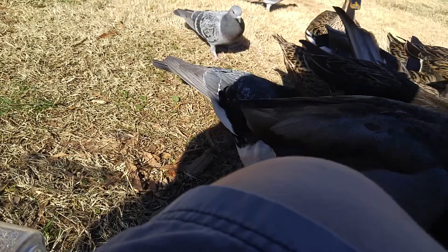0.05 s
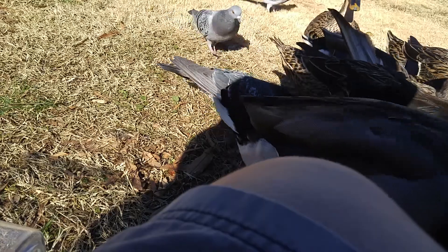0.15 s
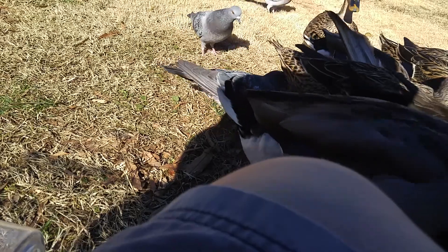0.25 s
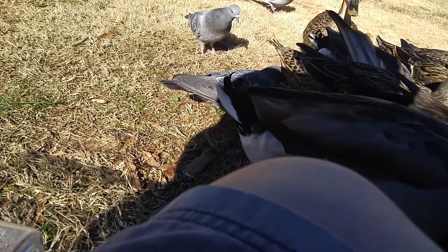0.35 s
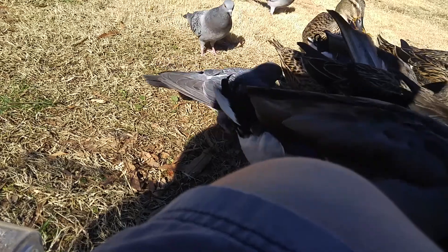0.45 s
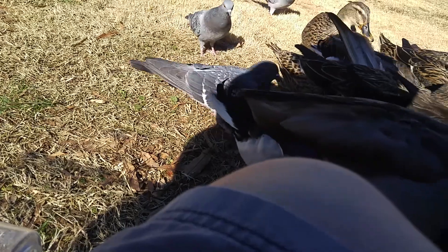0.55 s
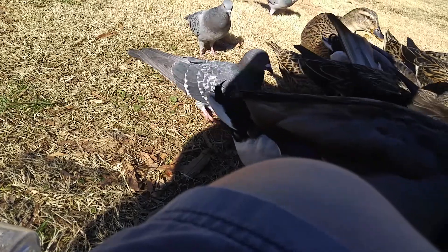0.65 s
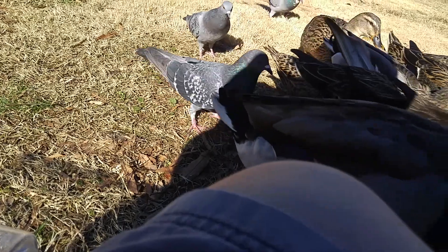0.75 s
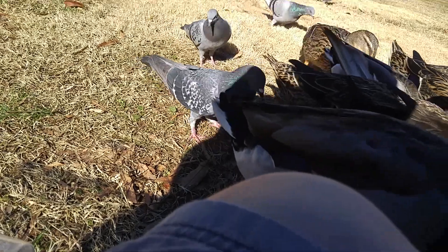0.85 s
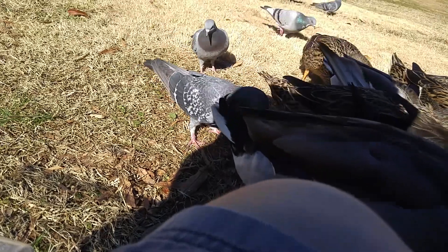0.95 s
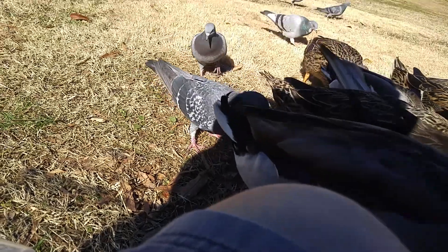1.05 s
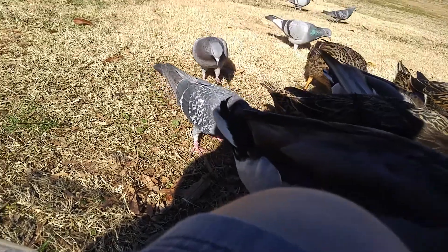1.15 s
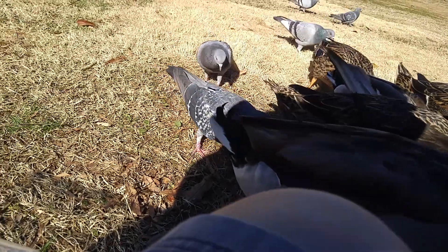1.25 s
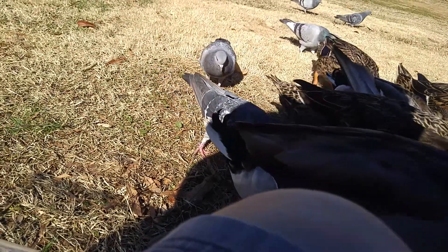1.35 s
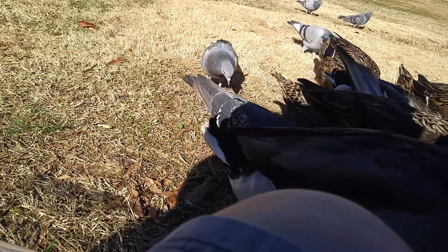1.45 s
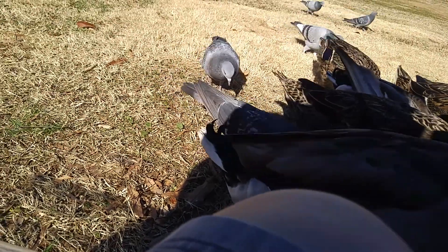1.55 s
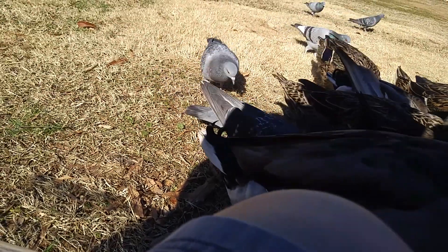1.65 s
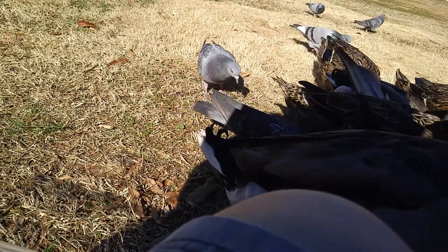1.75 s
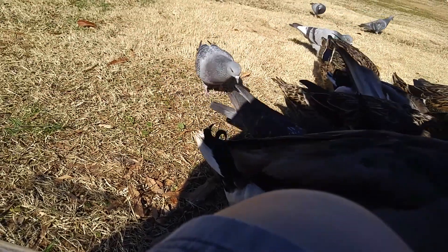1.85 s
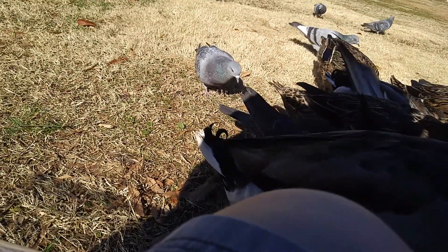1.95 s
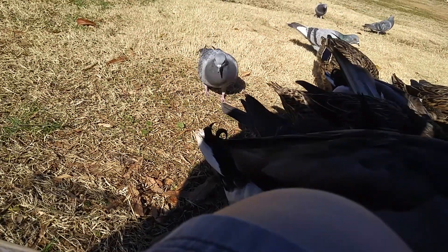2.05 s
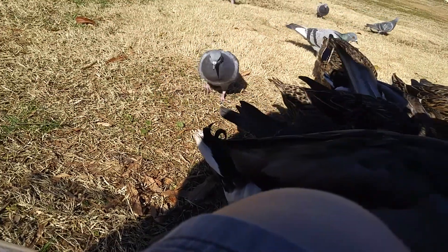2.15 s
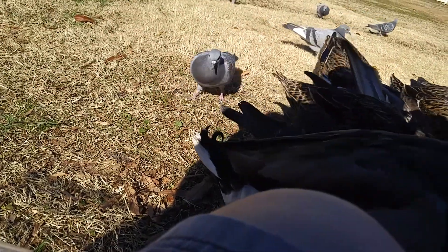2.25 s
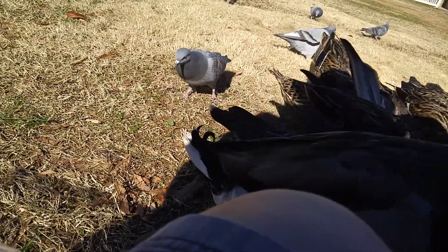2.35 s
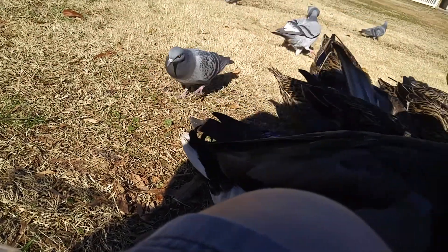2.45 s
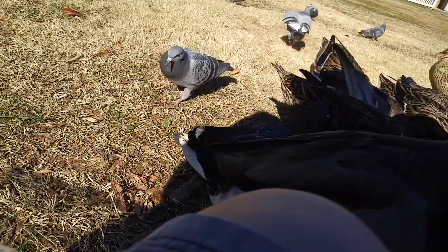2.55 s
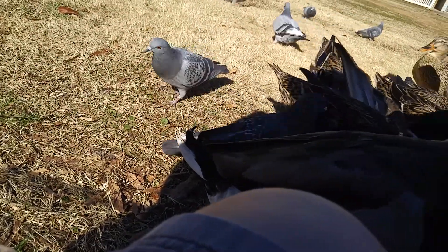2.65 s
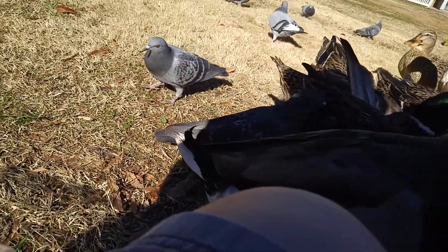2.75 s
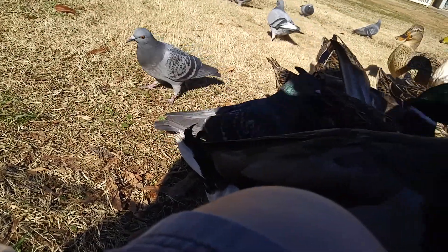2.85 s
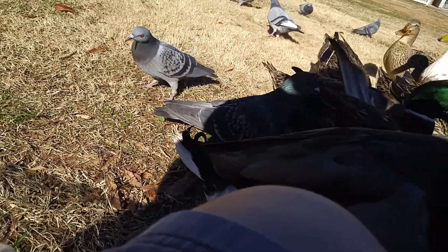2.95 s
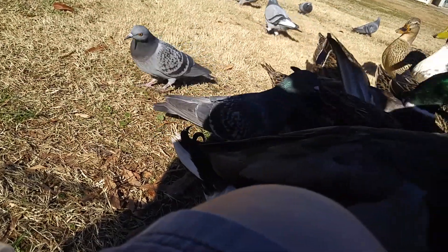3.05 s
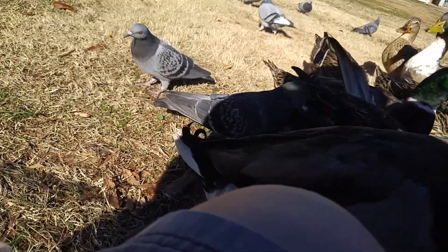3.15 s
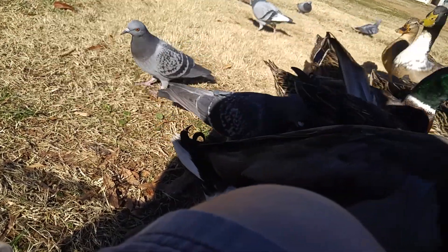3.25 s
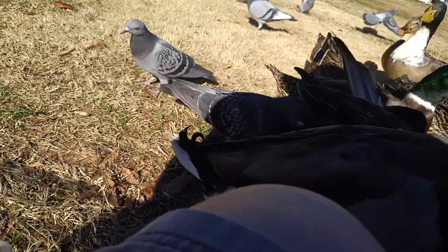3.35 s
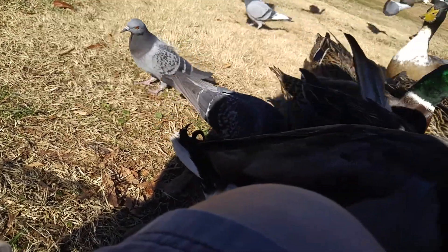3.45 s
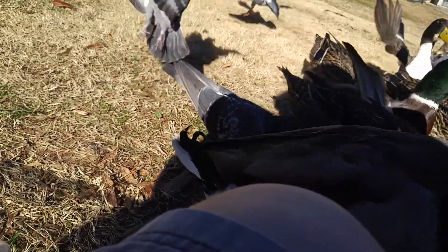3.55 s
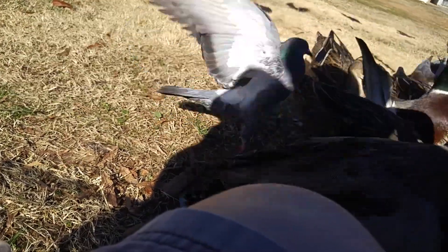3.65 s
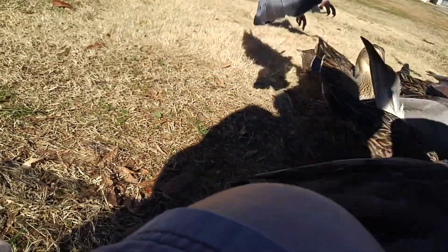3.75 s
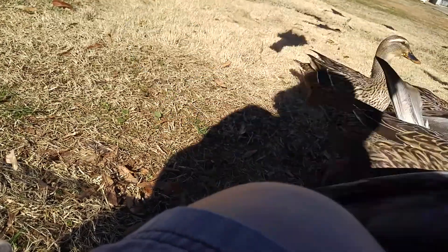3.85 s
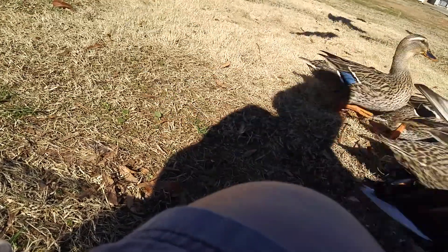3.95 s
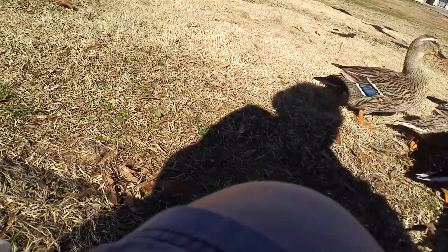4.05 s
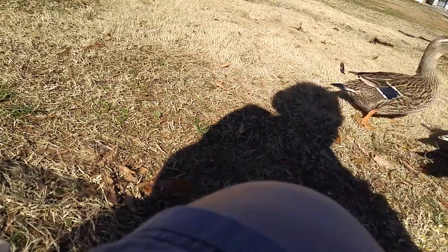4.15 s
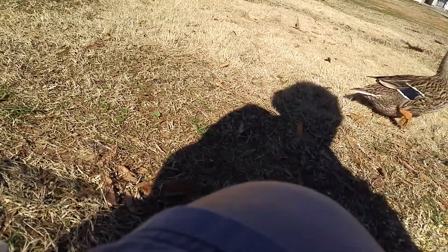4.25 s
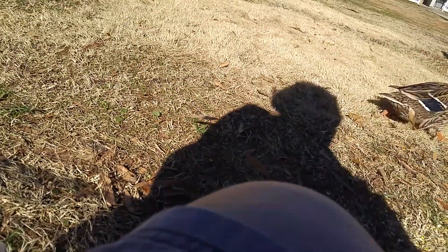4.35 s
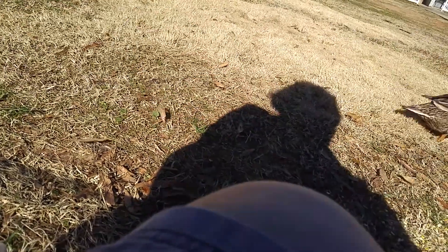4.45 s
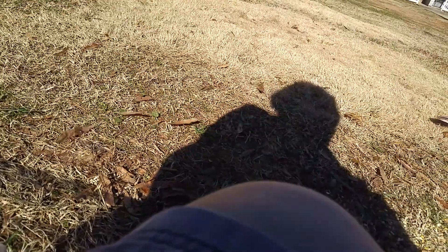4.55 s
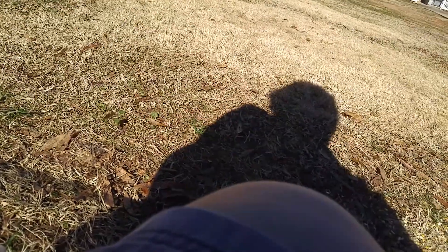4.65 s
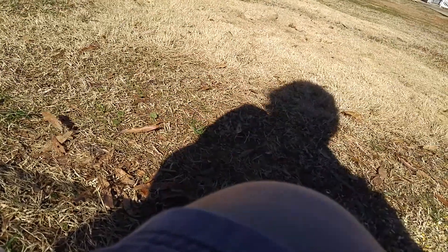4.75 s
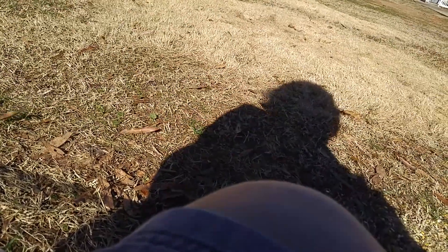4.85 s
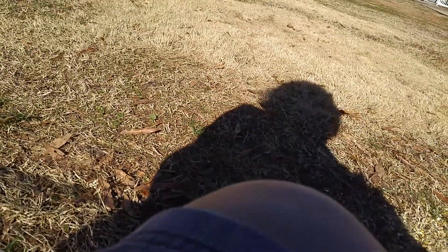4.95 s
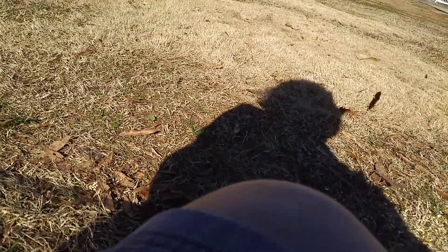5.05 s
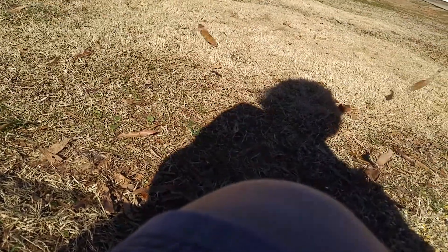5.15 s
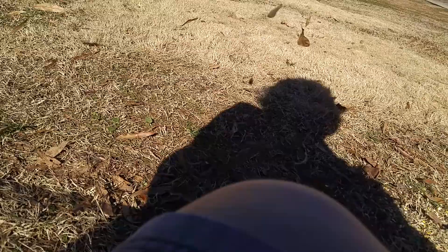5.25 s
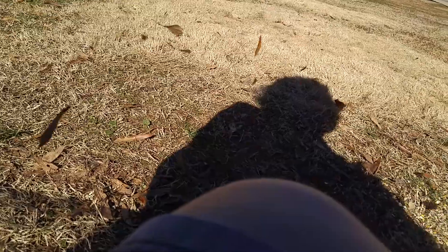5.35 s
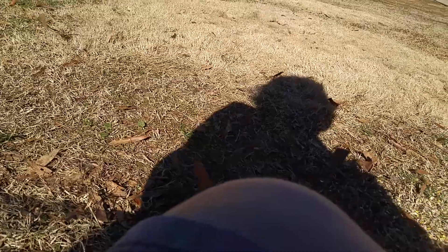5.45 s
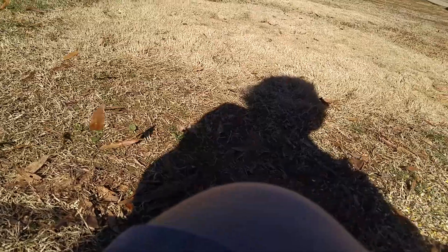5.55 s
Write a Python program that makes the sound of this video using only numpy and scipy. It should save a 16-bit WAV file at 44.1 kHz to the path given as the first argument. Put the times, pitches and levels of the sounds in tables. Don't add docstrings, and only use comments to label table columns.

```python
import sys
import numpy as np
from scipy import signal
from scipy.fft import rfft, irfft
from scipy.io import wavfile
from scipy.ndimage import uniform_filter1d

SR = 44100
rng = np.random.default_rng(int(sys.argv[2]) if len(sys.argv) > 2 else 0)


def makeup_ratio(level_db):
    decades = np.asarray(level_db, float) / 20
    return 10 ** decades


def wrap_up_sound(samples):
    columns = np.atleast_2d(samples).T
    tamed = np.clip(columns, -1, 1)
    steps = np.round(tamed * 32767).astype(np.int16)
    wavfile.write(sys.argv[1], SR, steps)


N = 246519
START, FADE = 0.52, 0.63

# (frequency [Hz], level [dB])
HUM_COLOUR = [(15, -39), (25, -58), (46, -9.5), (64, -0.5), (130, -11), (220, -11), (290, -14.5),
              (480, -120)]
# (frequency [Hz], level [dB])
PATTER_COLOUR = [(100, -13.5), (170, -7.5), (210, -7), (370, 1), (428, -2.5), (504, -16.5), (589, -4),
                 (688, -2.5), (810, -7.5), (1040, -14.5), (1200, -19), (1560, -28), (2640, -120)]
# (frequency [Hz], level [dB])
EDGE_COLOUR = [(590, 5), (1000, -20), (1450, 5), (2620, 2.5), (3400, -11), (4420, -9.5), (5600, 1),
               (7480, -60)]
# (frequency [Hz], level [dB])
RUSTLE_COLOUR = [(1760, -4), (3000, -5.5), (4830, -4), (5920, -0.5), (6300, -1), (7670, -2), (8340, 4),
                 (10700, -5.5), (12900, -9.5), (15100, -12.5), (16000, -32)]
# (frequency [Hz], likeness [0-1])
LIKENESS = [(60, .75), (130, .72), (290, .82), (640, .8), (1400, .6), (3100, .25), (7000, .1)]
# (frequency [Hz], left minus right [dB])
BALANCE = [(60, 2.5), (130, 0.5), (250, -1.5), (600, 0.2), (1500, 6), (4000, -5.5), (8000, 0)]
# (frequency [Hz], lead [rad])
PORT_LEAD = [(100, -1.9), (300, 1), (800, -1.6), (1720, -3), (2410, -6), (5170, -7.5), (7920, -14),
             (15000, -23)]

# (time [s], pitch [Hz], level [dB])
ENGINE = [
    (.5, 129, -45),
    (1.3, 129.4, -46),
    (2.2, 105.3, -43.5),
    (3.5, 101, -42),
    (4.0, 93, -43),
]
# (time [s], stir
# [dB])
STIR = [(.74, 8), (.95, 6.5), (1.2, 3.5), (1.8, 0.5), (2.4, 3.5), (2.62, 0), (3.5, 0.5), (3.6, 3.5),
        (3.7, 13), (3.8, 17), (3.95, 15), (4.2, 11.5), (4.6, 14.5), (4.87, 18.5), (5.0, 18.5), (5.15, 17.5),
        (5.45, 14), (5.58, 13)]
# (time [s], left minus right [dB])
FLOCK_SIDE = [
    (.55, 0),
    (1.0, -2),
    (3.9, 0.5),
    (4.1, 5),
    (4.5, -1.5),
    (4.6, -1.5),
    (5.58, -1.5),
]
# (time [s], half length [s], level [dB])
DRAUGHTS = [
    (0.874, .2, 2.5),
    (3.774, 0.09, 3.5),
    (4.044, 0.041, 14.5),
    (4.216, 0.17, 6.5),
    (4.496, 0.12, 8),
    (4.87, 0.21, 0.5),
    (5.268, 0.39, -9.5),
]
# (time [s], half length [s], level [dB])
BRUSHES = [
    (0.816, 0.035, 6.5),
    (2.5, 0.087, 12.5),
    (3.604, 0.088, 6),
    (3.813, 0.6, 8),
    (4.133, 0.033, 6),
    (4.3, 0.037, 9),
    (4.736, 0.23, 4.5),
]
# (time [s], half length [s], level [dB])
WING_SWELLS = [
    (3.8, .2, 5),
    (4.88, .15, 3),
]

# (time [s], peak [dB], lower part relative [dB], left minus right [dB])
FEATHERS = [(3.5992, -23, -22, 7.5), (3.7316, -30, -21, 3), (3.7509, -17.5, -29, 14),
            (3.7945, -2, -15.5, 9), (3.8387, -21, -14, 8), (3.893, -20, -28, 9), (3.909, -7.5, -24, 9),
            (3.9729, -24, -19, 2.5), (4.0096, -2.5, -20, 8), (4.1148, -15.5, -18, -5),
            (4.132, -20, -19, 2.5), (4.1649, -22.5, -18, -3), (4.2037, -13.5, -17, 0),
            (4.2428, -15.5, -25, 2), (4.362, -18.5, -32, 3), (4.3848, -15.5, -18, 11),
            (4.4717, -22, -18, 11), (4.505, -13.5, -13, 5), (4.5346, -14, -23, -2), (4.5529, -10.5, -13, 4),
            (4.579, -12.5, -30, 8), (4.6739, -33, -14, 5), (4.7102, -4.5, -19, 7),
            (4.7463, -3.5, -16, -0.5), (4.7656, -11.5, -7, 3), (4.8145, -22, -12, 4),
            (4.8548, -12.5, -16, -1.0), (4.864, -9.5, -2, 2), (4.9256, -21, 3, 1), (4.9703, -20, -12, 4),
            (4.9909, -11.5, -10.5, -2.5), (5.015, -8, -9, -2.5), (5.077, -38, -7, -3.5),
            (5.0928, -16, -8.5, 1), (5.176, -21, -8, -2.0), (5.209, -13, -21, -3), (5.2855, -19, -21, -9),
            (5.3278, -20, -19, -5), (5.3686, -19, -9, -7), (5.514, -19, -11, -8)]
# (time [s], peak [dB], low ring [Hz], upper ring relative [dB], left minus right [dB])
BEATS = [(3.777, -27, 260, 20, 9), (3.798, -9.5, 284, 4, -2), (3.837, -4.5, 377, 9, -5),
         (3.891, -1.5, 443, 2, 1.5), (3.934, -9.5, 392, -3, -2), (3.989, -5, 413, 3, -2),
         (4.008, -5.5, 258, 28, 6), (4.019, -22, 153, -31, 24), (4.029, -11, 270, -6, 23),
         (4.046, -12, 135, -13, 22), (4.066, -19, 238, -10, 17), (4.088, -20.5, 257, -6, 10),
         (4.138, -9.5, 416, 3, -2), (4.165, -22, 296, 18, -4), (4.243, -16, 259, -5, 16),
         (4.27, -23, 203, -20, 16)]
# (time [s], peak [dB], low ring [Hz], upper ring relative [dB])
FLAPS = [(4.347, -17.5, 392, -20), (4.45, -17.5, 347, -24), (4.505, -19, 290, -12), (4.615, -16, 393, -36),
         (4.657, -17, 315, 5), (4.736, -18, 463, -29), (4.832, -23, 282, -30), (4.847, -13, 300, -5),
         (4.874, -13, 364, -36), (4.904, -21, 390, -29), (4.987, -7.5, 382, 5), (5.004, -6.5, 378, -33),
         (5.104, -4, 352, -6), (5.131, -29, 385, -7), (5.198, -9.5, 380, -4), (5.216, -12.5, 274, 10),
         (5.238, -14.5, 338, -26), (5.284, -13, 390, 25), (5.297, -10, 410, -16), (5.367, -13.5, 344, -38),
         (5.413, -20.5, 378, -31), (5.466, -17, 368, -21), (5.515, -16.5, 293, -10), (5.562, -12, 399, -28)]
# (time [s], peak [dB], lower part relative [dB], left minus right [dB])
STALKS = [(0.798, -34, -22, 13), (1.019, -36, -20, -13), (1.1803, -27.5, 16, -2), (1.617, -36, -15, -12),
          (1.707, -35, -29, -8), (1.8283, -38, -18, 4), (2.1665, -26.5, 20, -5), (2.253, -43, -12, -5),
          (2.489, -22, 26, 5.5), (2.7804, -32, -11, -16), (3.328, -33, -26, -19), (3.4273, -38, -3, -13),
          (3.484, -27, -29, 11)]
# (time [s], peak [dB], low ring [Hz], upper ring relative [dB])
STEPS = [(0.822, -3, 353, -25.5), (0.867, -8, 380, -11.5), (0.977, -15.5, 410, -10), (1.059, -24, 323, 0),
         (1.771, -10.5, 370, -3.5), (1.845, -21, 307, -8.5), (1.885, -23, 306, -15),
         (1.899, -15.5, 363, -5), (2.001, -15, 365, -12), (2.022, -22, 356, -9), (2.166, -4, 342, -4.5),
         (2.26, -20, 302, -21), (2.328, -25, 337, -27), (2.49, -21, 219, -7), (2.552, -26, 270, -17),
         (3.232, -23.5, 350, -23), (3.297, -6.5, 320, -10), (3.45, -18, 346, -12.5), (3.55, -21, 348, -18),
         (3.644, -33, 353, 0), (4.548, -1, 332, -11), (4.71, -3.5, 260, -3), (4.863, -4, 364, -11)]

# (start [s], length [s], level [dB], first pitch [Hz], last pitch [Hz])
PEEPS = [(0.685, 0.028, -34, 1410, 1580), (0.721, 0.03, -27.5, 1140, 927), (2.369, 0.039, -33, 866, 830),
         (0.543, 0.021, -30, 1000, 920), (1.755, 0.016, -28.5, 1160, 1064),
         (2.079, 0.016, -25.5, 1200, 1105), (2.619, 0.012, -30.5, 967, 1000),
         (2.94, 0.019, -29, 1070, 1045), (3.016, 0.0475, -35, 1054, 895), (3.285, 0.039, -37.5, 1215, 1110),
         (3.331, 0.034, -33, 1190, 873), (2.561, 0.022, -49.5, 7600, 7900)]
# (start [s], length [s], level [dB], bill resonance [Hz])
CREAKS = [(0.721, 0.0354, -39, 1640), (2.483, .018, -36, 2440), (0.898, 0.077, -40, 1700),
          (0.992, 0.049, -44, 1700), (1.058, 0.063, -35.5, 2270), (1.129, 0.056, -46, 1610),
          (1.383, 0.037, -43.5, 1740), (1.429, 0.071, -42.5, 2300), (1.582, 0.056, -46, 1700),
          (2.032, 0.056, -42, 1900), (2.265, 0.11, -38, 2050), (2.387, 0.043, -42, 1740),
          (2.5, 0.091, -39, 1950), (2.688, 0.037, -43.5, 1790), (2.783, 0.072, -38, 2430),
          (3.067, 0.061, -39, 1580), (3.222, 0.046, -45, 1900), (3.432, 0.032, -44, 1736)]
# (start [s], length [s], effort [dB], first pitch [Hz], last pitch [Hz])
GRUNTS = [
    (0.882, 0.069, -23, 347, 302.4),
    (1.168, 0.068, -23.5, 312, 281),
    (2.643, 0.052, -21.5, 280, 275),
    (2.871, 0.082, -18, 330, 258),
    (2.964, 0.038, -25, 300, 260),
    (3.299, 0.023, -28, 350, 345),
    (3.67, 0.065, -19.5, 304, 260),
]
# (start [s], length [s], effort [dB], first pitch [Hz], last pitch [Hz])
QUACKS = [
    (.55, 0.048, -16.5, 303, 267),
    (1.76, 0.031, -23, 401, 376),
    (2.078, 0.039, -15.5, 375, 318.4),
    (2.117, 0.019, -19, 313, 258),
    (2.606, 0.048, -22.5, 355, 367),
    (2.944, 0.033, -19.5, 289, 311.5),
    (3.02, 0.044, -26.5, 359, 359),
    (3.339, 0.0446, -21, 252, 252.7),
]
# (share of length [0-1], chest re effort [dB], bill relative [dB], bill resonance [Hz])
QUACK_COURSE = [
    (0, -24, 3, 1080),
    (.25, -11, -1.5, 1040),
    (.5, 2.5, -8, 980),
    (.78, -0.7, -8, 890),
    (1, -10, -11, 850),
]
# (share of length [0-1], chest re effort [dB], bill relative [dB], bill resonance [Hz])
GRUNT_COURSE = [
    (0, -9, -6, 700),
    (.12, -1.5, -14, 686),
    (.7, -3, -16, 680),
    (1, -9, -14, 660),
]


def evened(x):
    return x / np.sqrt(np.mean(x ** 2) + 1e-20)


def slow_noise(count, size):
    return evened(uniform_filter1d(rng.standard_normal(count), size))


def read(points, hz):
    f, value = np.transpose(points)
    return np.interp(np.log(hz + 1), np.log(f + 1), value)


def resonate(x, hz, width):
    turn = np.exp(2j * np.pi * np.cumsum(hz * np.ones(len(x))) / SR)
    r = np.exp(-np.pi * width / SR)
    return 2 * (turn * signal.lfilter([1 - r], [1, -r], x / turn + 1e-18)).real


def band(x, hz, width):
    return resonate(resonate(x, hz, width), hz, width)


def unrolled(rows):
    s, *columns = np.transpose(rows)
    t = np.arange(s[0], s[-1], 1 / SR)
    return s[0], [np.interp(t, s, c) for c in columns]


def add(mix, s, sound, pan_db=0.):
    part = mix[:, round(s * SR):][:, :len(sound)]
    part += makeup_ratio(np.array([[.5], [-.5]]) * pan_db) * sound[:part.shape[1]]


def engine():
    s, (hz, level_db) = unrolled(ENGINE)
    return s, makeup_ratio(level_db) * evened(band(rng.standard_normal(len(hz)), hz, 23.5))


def insect():
    air = rng.standard_normal(round(.32 * SR))
    return 1.85, makeup_ratio(-53.5) * evened(band(air, 8250, 220)) * np.hanning(len(air))


def bed(colour, per_s, spread_db, grain_s, smooth):
    bursts = makeup_ratio(spread_db * np.minimum(rng.exponential(1, N), 3)) * (rng.random(N) < per_s / SR)
    age = np.arange(4000) / SR / grain_s
    bursts = signal.oaconvolve(bursts, age * np.exp(-age))[:N]
    swish = evened(uniform_filter1d(uniform_filter1d(rng.standard_normal(N), size=600), size=600))
    gate = (smooth + evened(bursts)) * makeup_ratio(1.88 * swish)
    a, b = rfft(rng.standard_normal((2, N)) * gate)

    hz = np.fft.rfftfreq(N, 1 / SR)
    same = np.clip(read(LIKENESS, hz), -1, 1)
    lean = makeup_ratio(.5 * read(BALANCE, hz))
    pair = np.array([a * lean, (same * a + np.sqrt(1 - same ** 2) * b) / lean])
    pair = irfft(pair * makeup_ratio(read(colour, hz)), N)

    z = signal.stft(pair, nperseg=256)[2]
    patches = uniform_filter1d(rng.standard_normal(z.shape[1:]), size=12, axis=0)
    patches = evened(uniform_filter1d(patches, size=8, axis=1))
    above_hum = (np.arange(129) > 2)[:, None]
    pair = signal.istft(z * makeup_ratio(2.5 * patches * above_hum), nperseg=256)[1][:, :N]
    return pair / pair.mean(0).std()


def loudness(calm_db, follows, swells=()):
    t = np.arange(N) / SR
    side_db = np.array([[.5], [-.5]]) * np.interp(t, *np.transpose(FLOCK_SIDE))
    db = calm_db + follows * np.interp(t, *np.transpose(STIR)) + side_db
    for s, half, top_db in swells:
        db = db + top_db * np.clip(1 - abs(t - s) / half, 0, 1)
    return makeup_ratio(db)


def snap(lower_db, top_db):
    t = np.arange(round(.03 * SR)) / SR
    noise = rng.standard_normal(len(t))
    bright = band(noise, 8550, 1880) + makeup_ratio(-4.0) * band(noise, 6820, 4440)
    bright = evened(bright + makeup_ratio(top_db) * band(noise, 13800, 5000))
    lower = makeup_ratio(lower_db - 5) * evened(band(noise, 2340, 2250))
    decay = makeup_ratio(-60 * t / 0.0065) + makeup_ratio(-36 - 60 * t / .06)
    crack = (bright + lower) * (1 - np.exp(-t / 0.0013)) ** 2 * decay
    return crack / abs(crack).max()


def thump(low_hz, upper_db, rise_s, t60):
    t = np.arange(round(.07 * SR)) / SR
    shape = (1 - np.exp(-t / rise_s)) ** 2 * makeup_ratio(-60 * t / t60)
    sinking = t + 0.00049 * (1 - np.exp(-t / 0.00015))
    upper_hz, phase = rng.uniform(667, 850), 2 * np.pi * rng.random()
    low = np.sin(2 * np.pi * low_hz * sinking)
    upper = np.sin(2 * np.pi * upper_hz * sinking + phase) * makeup_ratio(-60 * t / 0.045)
    edge = evened(band(rng.standard_normal(len(t)), 1075, 370)) * makeup_ratio(-60 * t / 0.0068)
    push = low + makeup_ratio(upper_db + 7.0) * upper + makeup_ratio(upper_db + 12.5) * edge
    push = signal.lfilter(*signal.butter(2, 1600, fs=SR), push * shape)
    return push / abs(push).max()


def dipped(start, length, level_db, first_hz, last_hz):
    low_hz = min(first_hz, last_hz) * (1 - 0.099 * min(1, 1500 / first_hz))
    return [(start, first_hz, level_db),
            (start + 0.466 * length, low_hz, level_db),
            (start + length, last_hz, level_db)]


def peep(rows):
    s, (hz, level_db) = unrolled(rows)
    hoarse = 1 + .055 * slow_noise(len(hz), 60)
    turn = 2 * np.pi * np.cumsum(hz * hoarse) / SR
    whistle = np.sin(turn) + makeup_ratio(-22) * np.sin(2 * turn)
    return s, makeup_ratio(level_db + 3) * whistle * signal.windows.tukey(len(hz), .3)


def folds(hz, jitter):
    wobble = slow_noise(len(hz), 150)
    turns = rng.random() + np.cumsum(hz * (1 + jitter * wobble)) / SR
    harmonics = range(1, int(5200 / hz.mean()))
    return turns, evened(sum(np.cos(2 * np.pi * k * turns) for k in harmonics))


def arched(start, length, level_db, bill_hz):
    ends_db, shut_hz = -4, 1370
    return [(start, level_db + ends_db, shut_hz),
            (start + 0.39 * length, level_db, bill_hz),
            (start + length, level_db + .5 * ends_db, 1.07 * shut_hz)]


def creak(rows):
    s, (level_db, bill_hz) = unrolled(rows)
    turns, pulses = folds(np.full(len(bill_hz), rng.uniform(85, 100)), jitter=.15)
    puffs = (.08 + np.exp(-(turns % 1) / .3)) * rng.standard_normal(len(turns))
    drive = .9 * pulses + 2.2 * puffs
    bill = band(drive, bill_hz, 380) + makeup_ratio(-8) * band(drive, 1.25 * bill_hz, 400)
    bill = bill + makeup_ratio(-9) * band(drive, 1430, 300)
    return s, makeup_ratio(level_db) * evened(bill) * signal.windows.tukey(len(turns), .6)


def called(course, start, length, effort_db, first_hz, last_hz):
    share, chest_db, bill_db, bill_hz = np.transpose(course)
    glide_share = 0.37
    hz = last_hz + (first_hz - last_hz) * np.clip(1 - share / glide_share, 0, 1)
    opening_db = 0.76 * (effort_db + 19.5)
    return np.transpose([start + share * length, effort_db + chest_db, hz, bill_db + opening_db, bill_hz])


def grunt(rows):
    s, (chest_db, hz, bill_db, bill_hz) = unrolled(rows)
    turns, pulses = folds(hz, jitter=.025)
    shimmer = makeup_ratio(2 * slow_noise(len(hz), 200))
    chest = np.sin(2 * np.pi * turns) + makeup_ratio(-7.0) * np.sin(2 * 2 * np.pi * turns)
    chest = chest * (1 + .25 * np.sin(np.pi * turns))

    drive = pulses + .55 * rng.standard_normal(len(hz))
    opening_db = np.clip(bill_db, -25, 0)
    upper = band(drive, 1520, 600) + makeup_ratio(-9) * band(drive, 2250, 650)
    rasp = makeup_ratio(2.4 * np.minimum(chest_db + bill_db + 24, 0) - 13) * band(drive, 4000, 1800)
    bill = evened(band(drive, bill_hz, 320) + makeup_ratio(.9 * opening_db + 3) * upper + rasp)
    voice = makeup_ratio(chest_db) * (evened(chest) + makeup_ratio(bill_db) * bill)
    return s, voice * shimmer * signal.windows.tukey(len(hz), .25)


def scene():
    hum = bed(HUM_COLOUR, per_s=12, spread_db=-16.0, grain_s=0.055, smooth=15.0)
    patter = bed(PATTER_COLOUR, per_s=56, spread_db=-3.0, grain_s=0.0087, smooth=0.83)
    edge = bed(EDGE_COLOUR, per_s=110, spread_db=11, grain_s=0.007, smooth=0.59)
    rustle = bed(RUSTLE_COLOUR, per_s=190, spread_db=4, grain_s=0.0023, smooth=2.6)
    crackle = bed(RUSTLE_COLOUR, per_s=260, spread_db=10, grain_s=0.00066, smooth=0.088)
    mix = hum * loudness(-43.5, 1.0, DRAUGHTS)
    mix += patter * loudness(-39, 1.038)
    mix += edge * loudness(-54.0, 0.9, WING_SWELLS)
    mix += rustle * loudness(-54, 1.0, BRUSHES)
    mix += crackle * loudness(-68, 1.51, BRUSHES)

    near = np.zeros((2, N))
    add(near, *engine(), pan_db=2.5)
    add(near, *insect())
    for s, db, lower_db, pan_db in FEATHERS:
        add(near, s - .0003, makeup_ratio(db + 3.5) * snap(lower_db + 8.5, top_db=-15), pan_db)
    for s, db, lower_db, pan_db in STALKS:
        add(near, s - .001, makeup_ratio(db + 4.5) * snap(lower_db, top_db=-5), pan_db)
    for s, db, hz, upper_db, pan_db in BEATS:
        add(near, s - .003, makeup_ratio(db) * thump(hz, upper_db, rise_s=.004, t60=.045), pan_db)
    for s, db, hz, upper_db in FLAPS:
        add(near, s - .003, makeup_ratio(db) * thump(hz, upper_db, rise_s=.004, t60=.045), pan_db=-2.5)
    for s, db, hz, upper_db in STEPS:
        add(near, s - .0005, makeup_ratio(db) * thump(hz, upper_db + 4, rise_s=.0012, t60=.03), pan_db=-3.5)
    for row in PEEPS:
        add(near, *peep(dipped(*row)), pan_db=4.5)
    for row in CREAKS:
        add(near, *creak(arched(*row)), pan_db=6.0)
    for course, calls in ((GRUNT_COURSE, GRUNTS), (QUACK_COURSE, QUACKS)):
        for row in calls:
            add(near, *grunt(called(course, *row)), pan_db=-3.5)
    return mix + signal.lfilter(*signal.iirnotch(510, 3.5, SR), near)


def ports(x):
    lead = read(PORT_LEAD, np.fft.rfftfreq(N, 1 / SR))
    left = rfft(x[0])
    ahead, over, aside = (irfft(left * np.exp(1j * share * lead), N) for share in (.45, .1, 1))
    t = np.arange(N) / SR
    risen = np.clip((t - 3.65) / .08, 0, 1)
    moved = np.clip((t - 4.35) / .08, 0, 1)
    return np.array([(1 - risen) * ahead + (risen - moved) * over + moved * aside, x[1]])


def roll_off(x):
    return signal.sosfilt(signal.butter(12, 16820, fs=SR, output="sos"), x)


def record(dry):
    t = np.arange(N) / SR
    rise = (t > START) * np.clip(0.033 + (t - START) / FADE, 0, 1) ** 0.89
    low_cut = signal.butter(3, 36, "high", fs=SR, output="sos")
    firm = signal.sosfilt(low_cut, ports(dry))
    overloaded = np.tanh(firm * rise * 1.2) / 1.2
    limit = signal.firwin(255, 15900, window=("kaiser", 8), fs=SR)
    wet = signal.oaconvolve(overloaded, limit[None], "same") * (t > START)
    return roll_off(wet)


dry = scene()
out = record(dry)
wrap_up_sound(out)
```